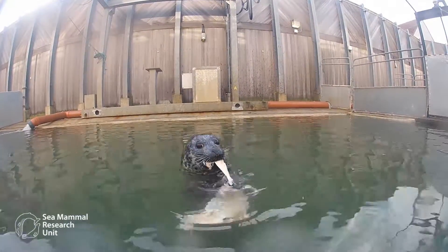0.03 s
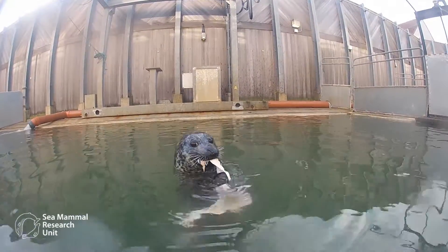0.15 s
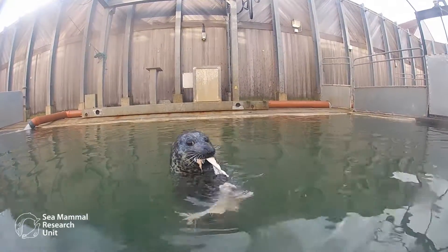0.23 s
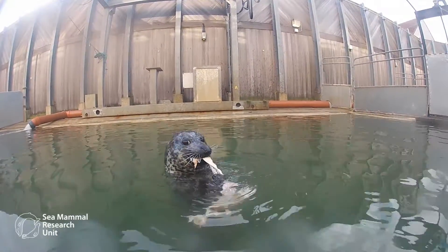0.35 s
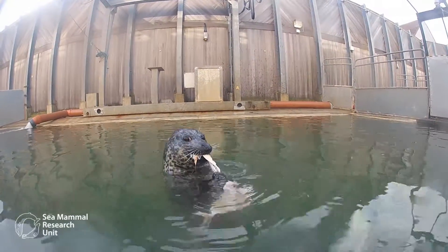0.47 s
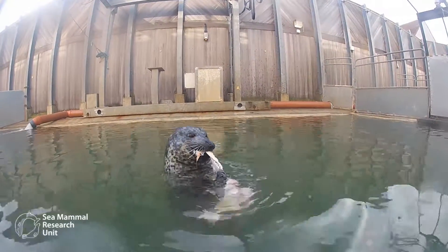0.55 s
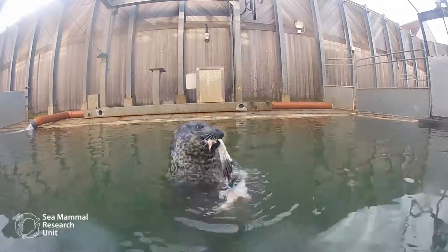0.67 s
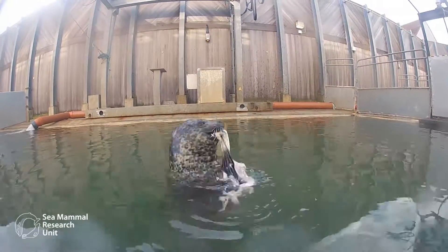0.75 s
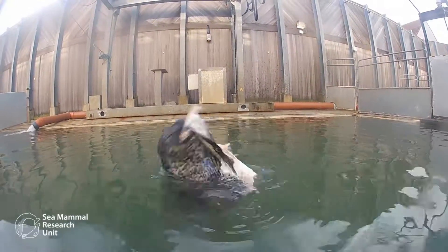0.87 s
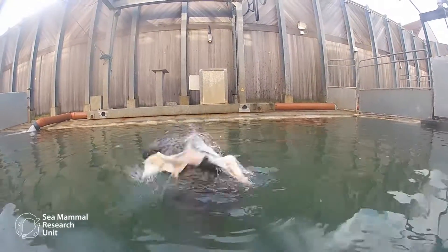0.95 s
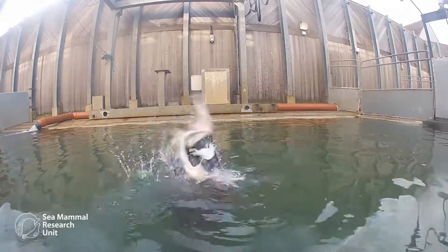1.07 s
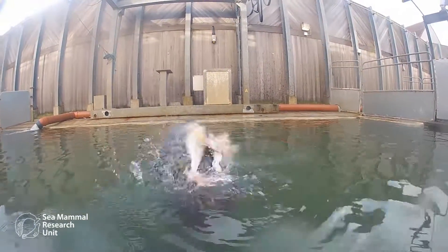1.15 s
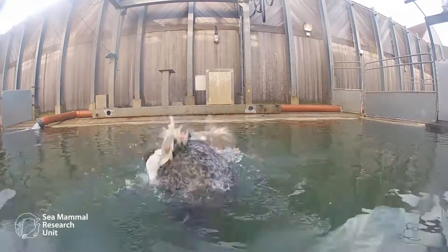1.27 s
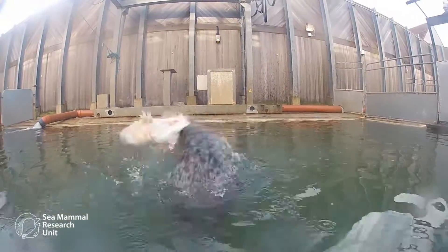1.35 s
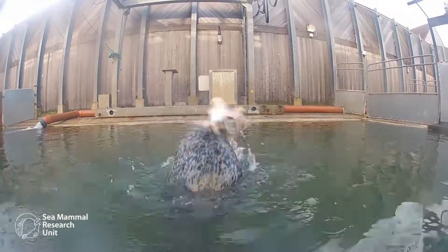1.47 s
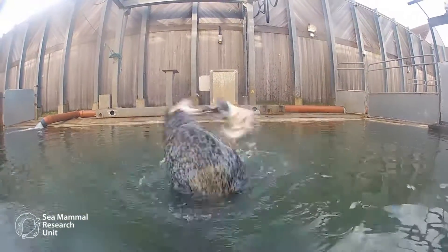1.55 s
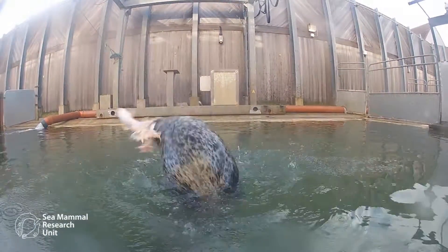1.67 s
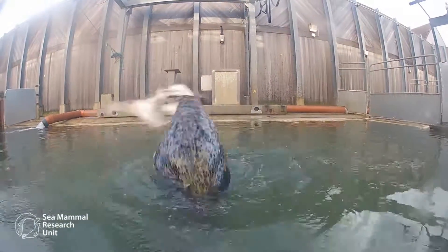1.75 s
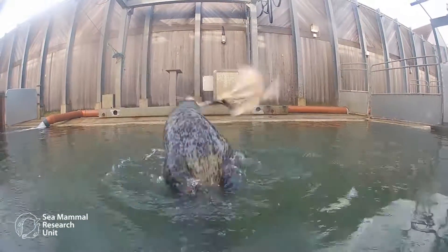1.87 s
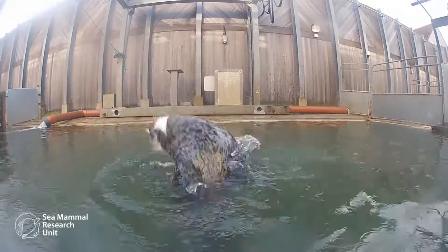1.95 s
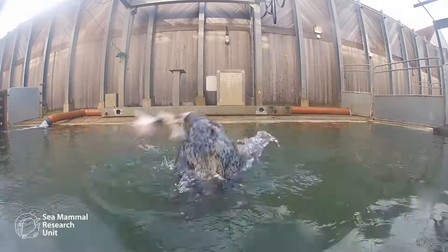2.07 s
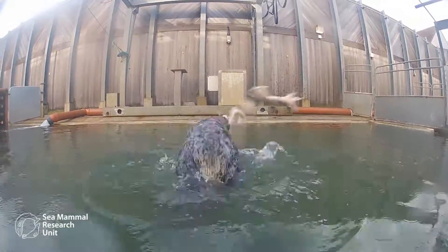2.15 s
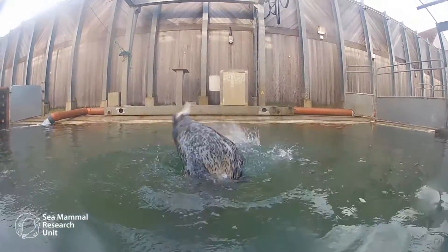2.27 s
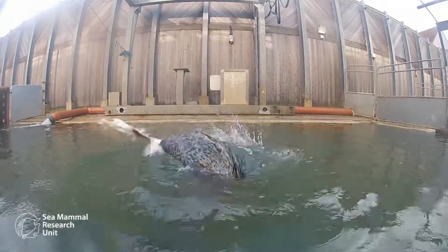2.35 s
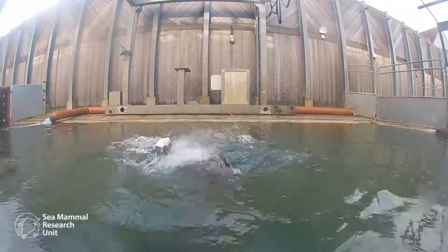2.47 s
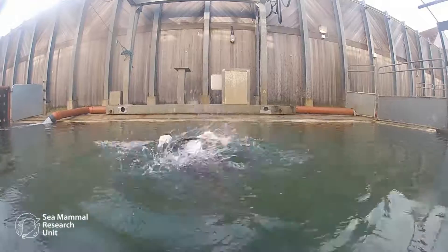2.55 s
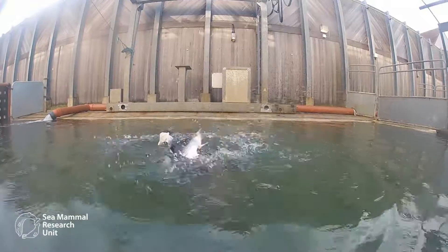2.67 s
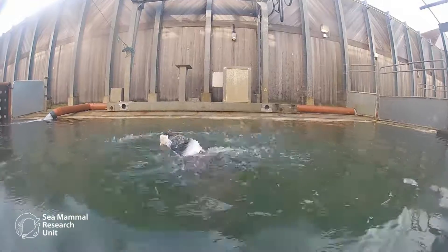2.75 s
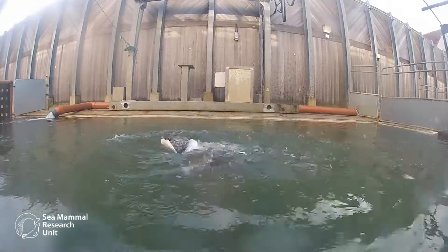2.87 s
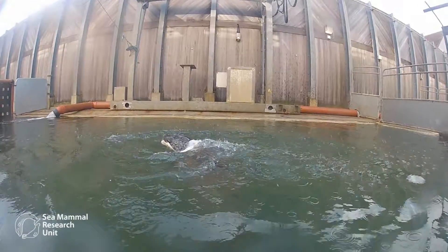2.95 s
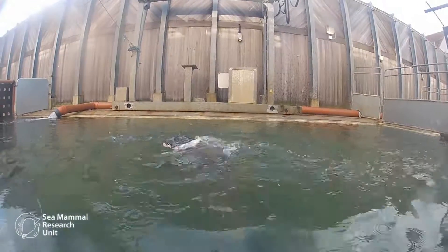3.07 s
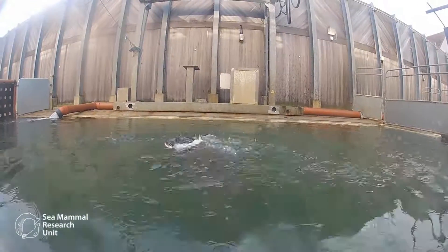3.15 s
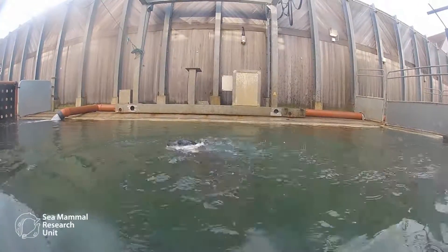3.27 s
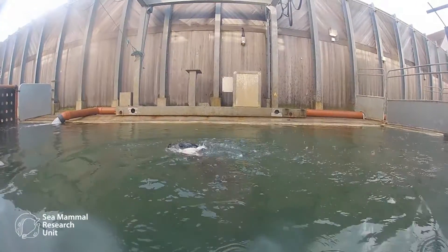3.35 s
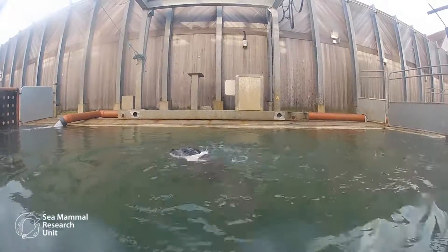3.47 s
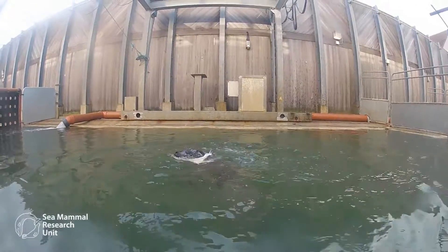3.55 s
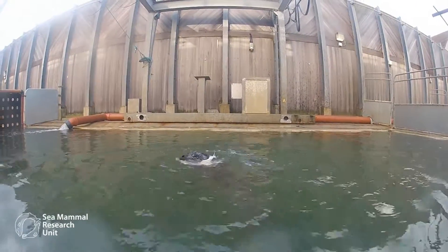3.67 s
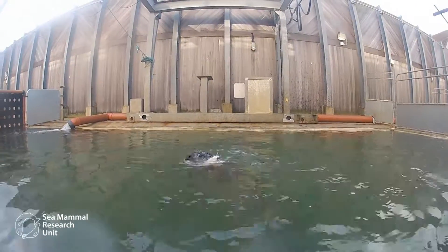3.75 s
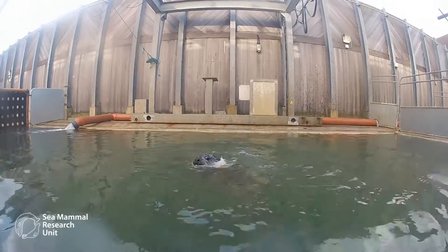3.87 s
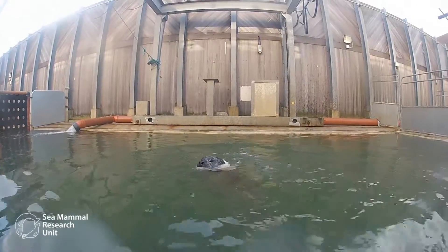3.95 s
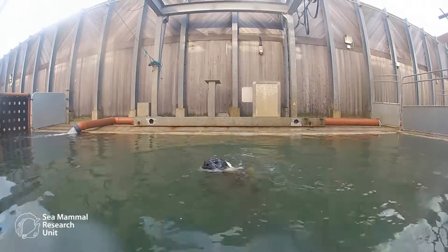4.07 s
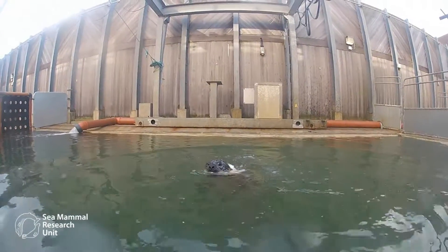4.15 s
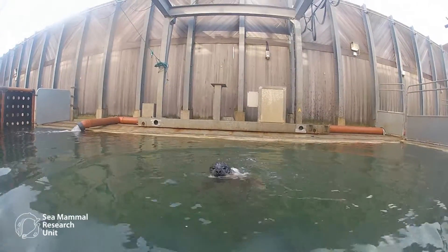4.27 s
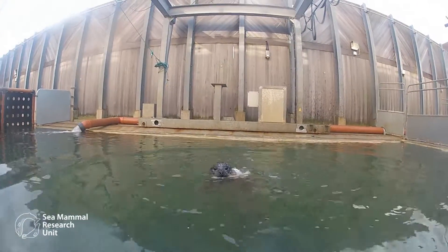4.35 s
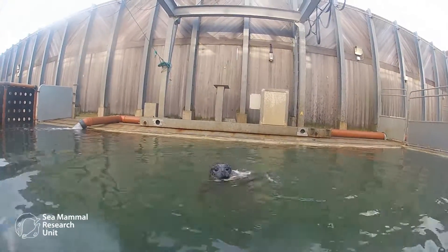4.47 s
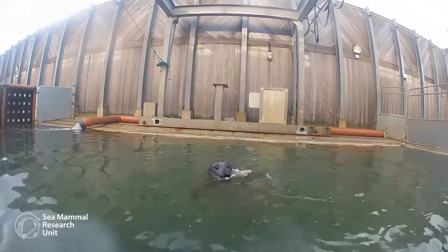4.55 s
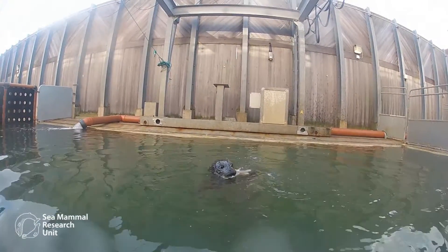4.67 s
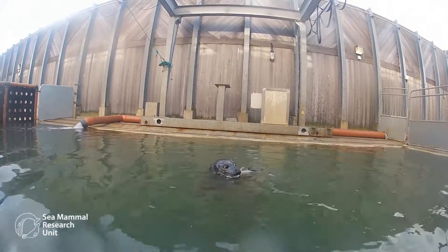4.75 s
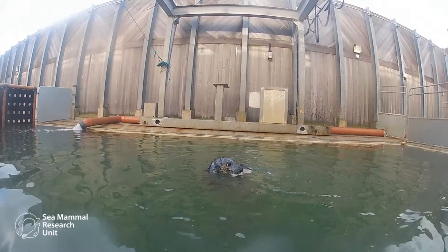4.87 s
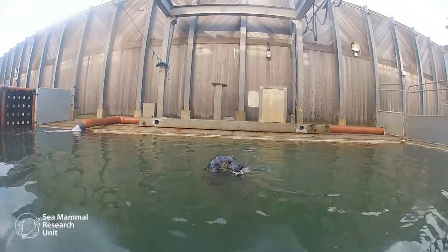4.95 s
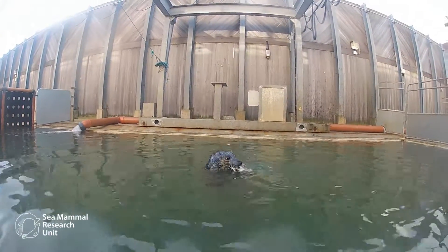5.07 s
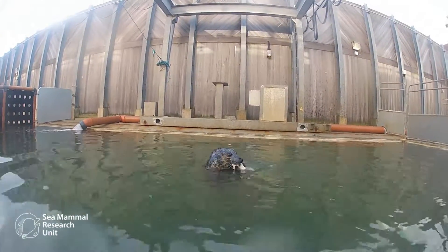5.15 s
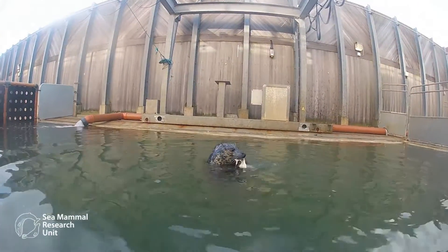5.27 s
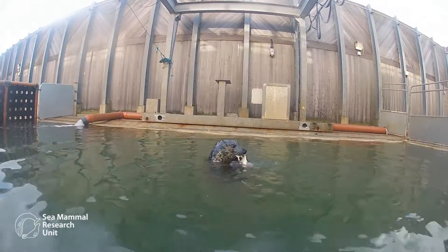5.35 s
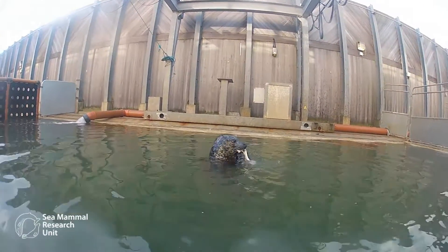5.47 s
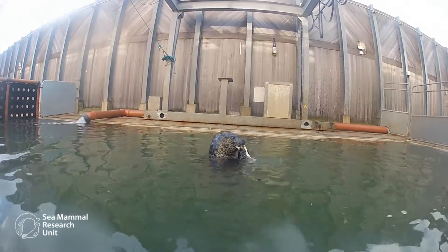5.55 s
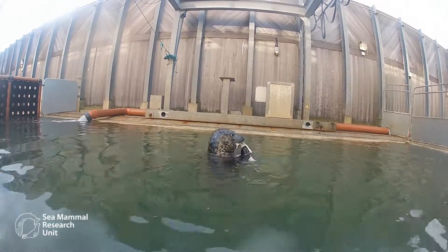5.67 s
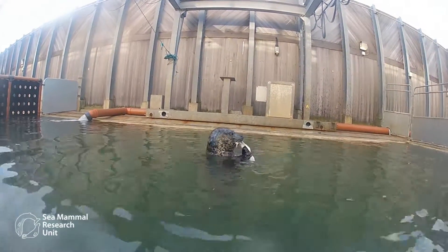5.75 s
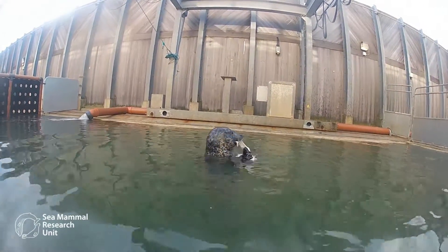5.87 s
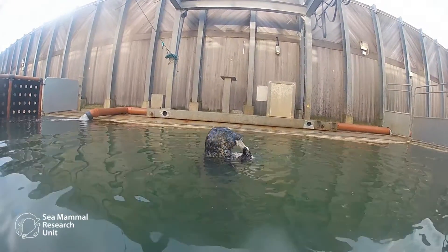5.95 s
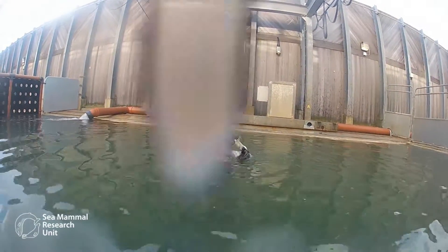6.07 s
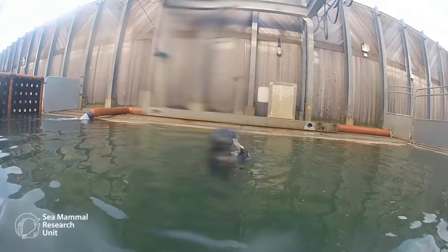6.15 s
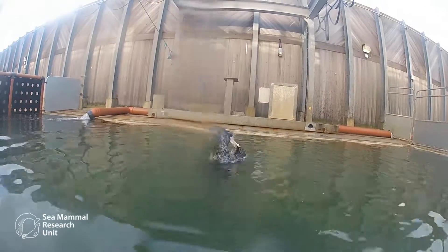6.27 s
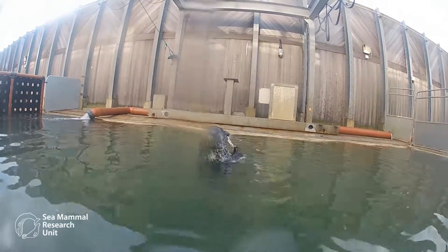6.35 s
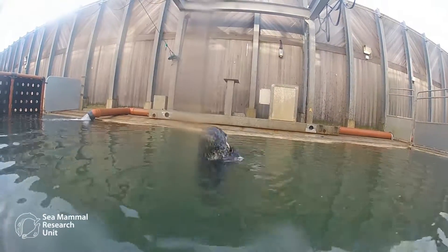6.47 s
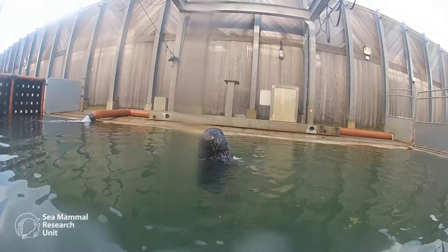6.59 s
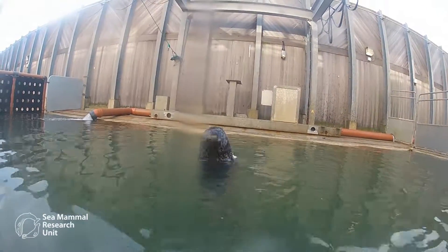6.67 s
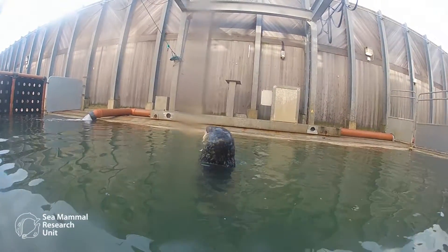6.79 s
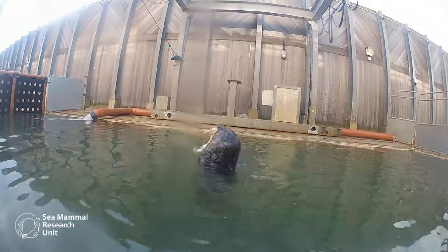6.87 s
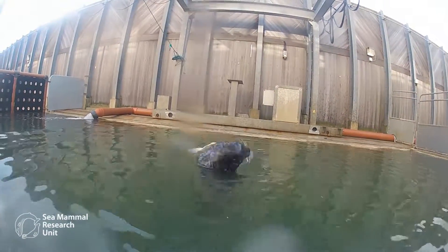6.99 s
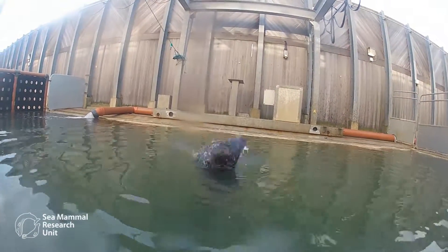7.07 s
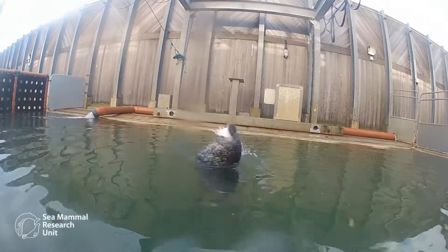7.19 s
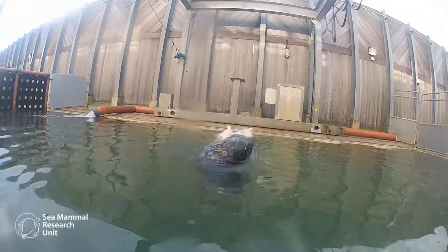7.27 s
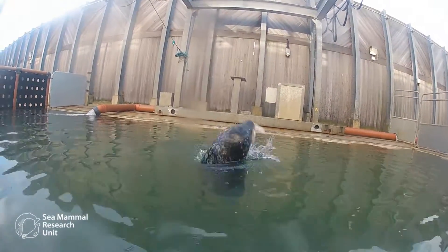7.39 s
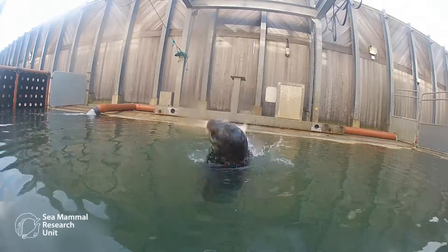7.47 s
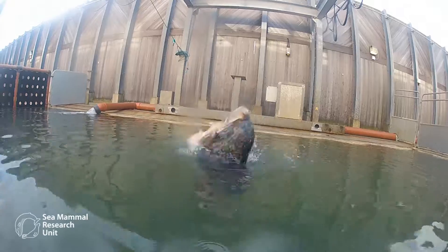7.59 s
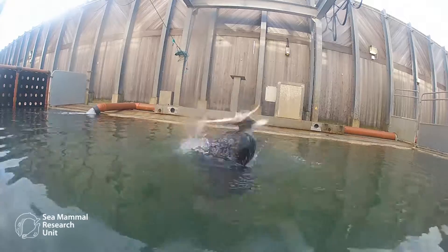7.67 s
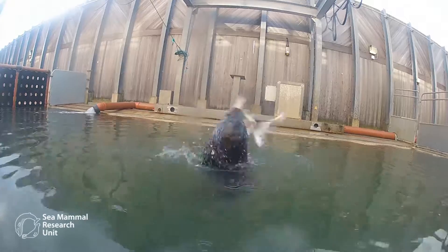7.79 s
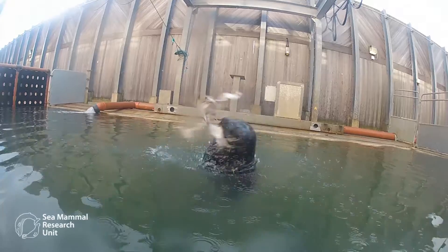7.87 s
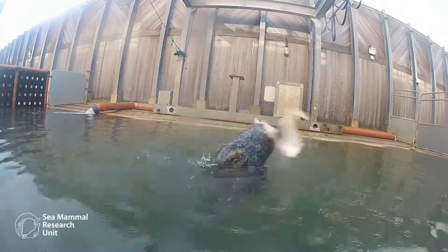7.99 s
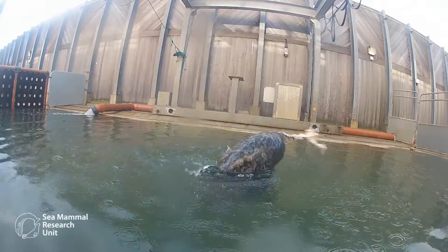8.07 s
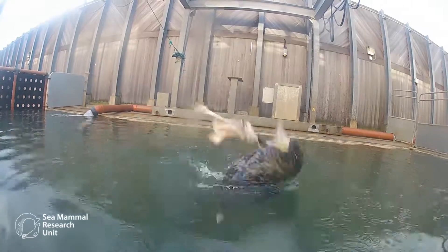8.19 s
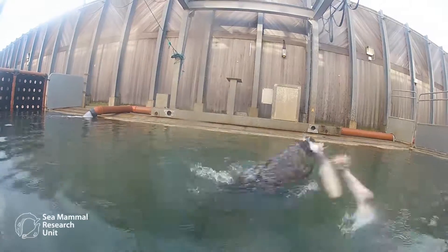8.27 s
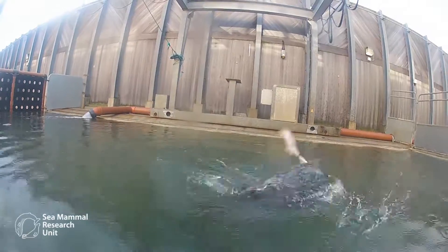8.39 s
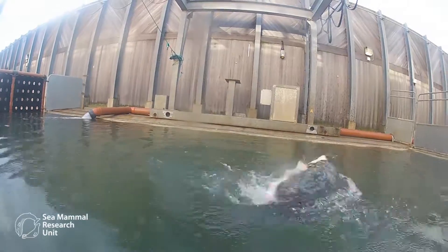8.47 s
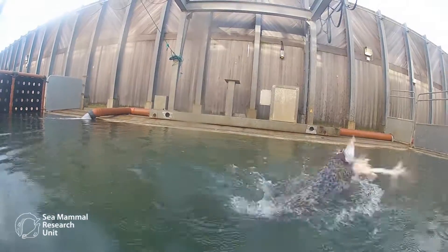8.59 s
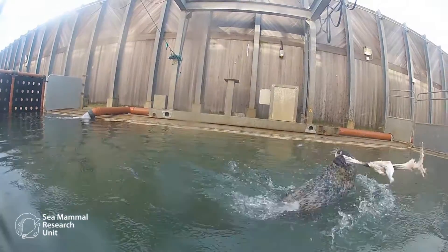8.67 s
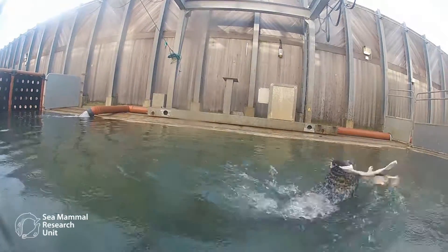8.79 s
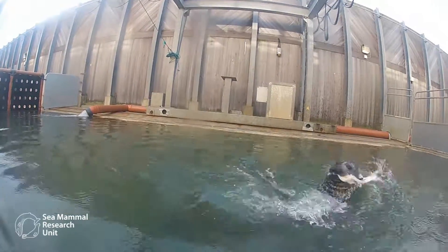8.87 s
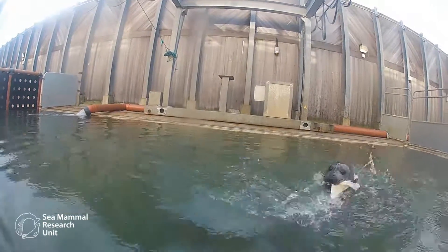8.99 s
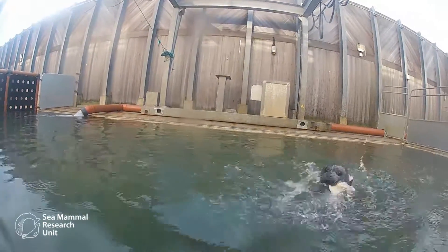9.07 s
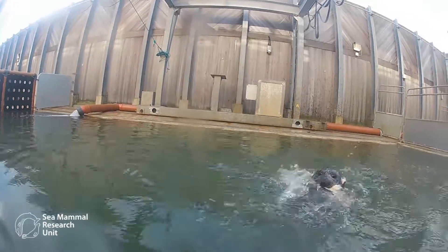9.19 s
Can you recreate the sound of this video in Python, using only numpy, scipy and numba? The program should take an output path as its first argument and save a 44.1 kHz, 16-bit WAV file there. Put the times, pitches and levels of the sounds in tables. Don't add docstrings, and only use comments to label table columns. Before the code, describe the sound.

A seal thrashes a fish in an outdoor pool, bright splashes, slaps and spray in two bouts, quiet lapping and faint gulls between.

```python
import sys
import numpy as np
from scipy import signal
from scipy.fft import rfft, irfft, next_fast_len
from scipy.io import wavfile
from scipy.ndimage import uniform_filter1d
from numba import njit

SR = 44100
rng = np.random.default_rng(int(sys.argv[2]) if len(sys.argv) > 2 else 0)


def ratio(d):
    e = np.asarray(d, float) / 20
    return 10 ** e


def materialize(psi):
    bounded = np.clip(np.atleast_2d(psi).T, -1, 1)
    quanta = np.round(bounded * 32767).astype(np.int16)
    wavfile.write(sys.argv[1], SR, quanta)


N = 407043


def level(x, db):
    return x * ratio(db) / np.sqrt(np.mean(x ** 2))


def curve(table):
    s, *columns = np.transpose(table)
    return [np.interp(np.arange(N) / SR, s, c) for c in columns]


def shaped(x, gain):
    size = next_fast_len(len(x))
    hz = np.arange(size // 2 + 1) * SR / size + 1e-3
    return irfft(rfft(x, size) * gain(hz), size)[:len(x)]


def colour(table):
    hz, db = np.transpose(table)
    noise = rng.standard_normal(N)
    return level(shaped(noise, lambda f: ratio(np.interp(np.log(f), np.log(hz), db))), 0)


def walk(rate_hz):
    k = int(SR / rate_hz)
    held = np.repeat(rng.standard_normal(N // k + 1), k)
    return 1.292 * uniform_filter1d(uniform_filter1d(held, k), k)[:N]


def swells(s, db, fall_s, rise):
    t = np.arange(0, N + 64, 64) / SR - s[:, None]
    away = np.where(t < 0, -t / rise, t) / np.maximum(fall_s, .01)[:, None]
    power = ratio(2 * db[:, None] - 20 * away).sum(axis=0)
    return np.interp(np.arange(N) / 64, np.arange(len(power)), power)


@njit
def ring(out, start, turn, fade, glide, size):
    for k in range(len(start)):
        a, phase, step, i = size[k], 0., turn[k], start[k]
        while a > size[k] / 200 and i < len(out) and step < 2.5:
            out[i] += a * np.sin(phase)
            phase, step, a, i = phase + step, step * glide[k], a * fade[k], i + 1
    return out


def bubbles(s, hz, t60_s, rise, size):
    start = (s * SR).astype(np.int64)
    fade = 1000. ** (-1 / (t60_s * SR))
    glide = (1 + rise) ** (1 / (t60_s * SR))
    return ring(np.zeros(N), start, 2 * np.pi * hz / SR, fade, glide, size)


def swarm(count, lo_hz, hi_hz, cycles, spread_db, rise):
    when, pitch, bulk = rng.random((count, 3)).T
    hz = lo_hz * (hi_hz / lo_hz) ** pitch
    size_db = spread_db * np.minimum(-np.log(bulk), 3)
    return level(bubbles(when * N / SR, hz, 2 * cycles / hz, rise + 0 * hz, ratio(size_db)), 0)


def bursts(table, shell, attack_s):
    out, t = np.zeros(N + 4096), np.arange(2048) / SR
    for s, db, hz, t60_s, width in table:
        attack = 1 - np.exp(-(t / attack_s) ** 2)
        blow = rng.standard_normal(len(t)) * attack * 1000. ** (-t / max(t60_s, .003))
        width = max(width, 1.05)
        band = signal.butter(2, [hz / width, min(hz * width, 9000)], "band", fs=SR, output="sos")
        blow = signal.fftconvolve(signal.sosfilt(band, blow), shell)
        start = int(s * SR)
        out[start:start + len(blow)] += ratio(db) * blow / np.abs(blow).max()
    return out[:N]


# (pitch [Hz], width [Hz], level [dB])
CASE_MODES = [(828, 104, -15), (1060, 240, -11), (1671, 287, -5.5), (2010, 257, -2.5), (2500, 403, -0.5),
              (3150, 1060, -3), (3705, 380, 2), (4300, 320, -14.5), (4870, 1260, -8.5)]
CASE_LEAK_DB = -20


def case():
    f = np.arange(2049) * SR / 4096
    power = ratio(2 * CASE_LEAK_DB)
    for hz, width_hz, db in CASE_MODES:
        power = power + ratio(2 * db) / (1 + (2 * (f - hz) / width_hz) ** 2) ** 2
    cepstrum = irfft(np.log(power) / 2)
    cepstrum[1:2048] *= 2
    cepstrum[2049:] = 0
    return irfft(np.exp(rfft(cepstrum)))[:1500]


POOL_T60_S, POOL_DB = 0.32, -7.5


def pool(x):
    t = np.arange(SR // 2) / SR
    tail = rng.standard_normal(len(t)) * 1000. ** (-t / POOL_T60_S) * (t > .012)
    return x + ratio(POOL_DB) * signal.fftconvolve(x, tail / np.sqrt(np.sum(tail ** 2)))[:N]


# (frequency [Hz], density [dB per Hz])
RUMBLE_SPECTRUM = [(12, -34), (20, -13.5), (43, -6), (81, -13), (97, -21.5), (119, -12), (461, -21.5),
                   (732, -34), (900, -45), (1170, -64), (1980, -120)]
RUMBLE_DB = -65
OUTDOOR_DB, OUTDOOR_TILT = -60.5, -0.69


def outdoors(shell):
    hiss = shaped(rng.standard_normal(N), lambda f: (f / 2000 + 0.014) ** OUTDOOR_TILT)
    gusty = hiss * ratio(1.34 * walk(8.2))
    hiss = level(signal.fftconvolve(gusty, shell)[:N], OUTDOOR_DB)
    return hiss + colour(RUMBLE_SPECTRUM) * ratio(RUMBLE_DB + 4 + 0.26 * walk(3.33))


def calls(table, waver, onset):
    out = np.zeros(N)
    for s0, s1, hz0, hz1, db, over_db in table:
        span = slice(int(s0 * SR), int(s1 * SR))
        u = np.linspace(0, 1, span.stop - span.start)
        hz = (hz0 + (hz1 - hz0) * u ** 1.37) * (1 + waver[span])
        phase = 2 * np.pi * np.cumsum(hz) / SR
        tone = np.sin(phase) + ratio(over_db) * (np.sin(2 * phase) + 0.41 * np.sin(3 * phase))
        flutter_db = 1.5 * np.roll(waver, SR)[span] / waver.std()
        out[span] += ratio(db + flutter_db) * np.sin(np.pi * u ** onset) ** 0.7 * tone
    return out


# (start [s], start pitch [Hz], level [dB])
GULL_YELPS = [
    (.57, 1205, -64),
    (3.58, 1150, -63),
    (6.058, 1143, -59.5),
    (6.175, 1155, -60),
    (6.29, 1130, -61),
    (6.405, 1140, -62),
    (6.516, 1103, -63),
    (6.62, 1140, -64),
]
YELP_S, YELP_SAG, YELP_OVERTONES_DB = 0.053, 0.041, -13
# (start [s], length [s], pitch [Hz], level [dB], overtones [dB])
GULL_CRIES = [
    (2.85, 0.08, 1153, -63, -15),
    (3.62, 0.072, 1330, -61.5, -5),
    (3.663, 0.09, 1342, -67, 15),
    (3.73, 0.093, 1328, -78, 16),
]
CRY_CLIMB = -0.0067
# (start [s], end [s], start pitch [Hz], end pitch [Hz], level [dB], overtones [dB])
HOARSE_CRY = [
    (6.28, 6.72, 1610, 1660, -66.5, -15),
    (6.38, 6.71, 1730, 1710, -66.5, -14.5),
]
# (start [s], length [s], pitch [Hz], level [dB])
CHIRPS = [(0.752, 0.13, 4880, -69), (3.43, .06, 4780, -67), (3.7, .08, 4650, -69),
          (4.885, 0.052, 4800, -69), (4.96, .08, 4730, -73), (5.11, .05, 4640, -73),
          (5.04, 0.07, 4700, -64), (6.165, 0.081, 4710, -63.5), (6.25, 0.083, 5020, -70),
          (6.326, 0.12, 4600, -67.5), (6.448, .05, 4570, -70)]
CHIRP_SAG = 0.0094


def birds():
    yelps = [(s, s + YELP_S, hz, hz * (1 - YELP_SAG), db, YELP_OVERTONES_DB) for s, hz, db in GULL_YELPS]
    cries = [(s, s + length_s, hz, hz * (1 + CRY_CLIMB), db, over_db)
             for s, length_s, hz, db, over_db in GULL_CRIES]
    chirps = [(s, s + length_s, hz, hz * (1 - CHIRP_SAG), db, -40) for s, length_s, hz, db in CHIRPS]
    waver = .005 * walk(40)
    gulls = calls(yelps, waver, 1.6) + calls(cries, waver, .8) + calls(HOARSE_CRY, .02 * walk(90), 1.3)
    return gulls + calls(chirps, .002 * walk(40), .5)


# (time [s], level [dB], length [s])
NUDGES = [(0.23, -50.5, 0.13), (0.91, -54, 0.091), (1.03, -56, 0.13), (1.63, -57, 0.33), (2.1, -53, 0.068),
          (2.32, -57, 0.12), (2.47, -54, 0.05), (2.58, -55, 0.09), (2.76, -65, 0.13), (3.02, -51.5, 0.24),
          (3.4, -53.5, 0.09), (3.77, -56.5, 0.57), (3.95, -47.5, 0.063), (4.1, -52, 0.061),
          (4.31, -55, 0.09), (4.71, -48.5, 0.16), (4.96, -44, 0.088), (5.11, -53, 0.074),
          (5.46, -51.5, 0.06), (5.82, -52, 0.15), (6.05, -56.5, 0.033), (6.57, -54.5, 0.07),
          (6.83, -50, 0.13), (7.02, -55, 0.27), (7.48, -55, 0.09), (8.08, -52.5, 0.12), (8.23, -55, 0.055),
          (8.42, -52, 0.086), (8.805, -46.5, 0.1), (9.06, -45.5, 0.16)]
# (time [s], level [dB], fall time [s])
WASH_WAVES = [
    (5.27, -53.5, 0.32),
    (5.7, -53, 0.16),
    (4.55, -56, 0.13),
    (1.4, -61, .2),
]
BOB_HZ, BOB_REST_DB = 80.9, -66
NUDGE_RISE, NUDGE_FALL = 0.75, 0.48


def bob():
    s, db, length_s = np.transpose(NUDGES)
    rest = ratio(2 * BOB_REST_DB) * ratio(4.2 * walk(10))
    nudges = swells(s, db, NUDGE_FALL * length_s, NUDGE_RISE)
    wash = swells(*np.transpose(WASH_WAVES), 0.93)
    size = np.sqrt(rest + nudges + wash)
    phase = 2 * np.pi * np.cumsum(BOB_HZ * (1 + 0.055 * walk(14))) / SR
    rough = shaped(rng.standard_normal(N), lambda f: 1 / (1 + ((f - BOB_HZ) / 18) ** 2))
    return size * ratio(0.95 * walk(30)) * (1.3 * np.sin(phase) + level(rough, -2.5))


# (time [s], peak [dB], centre [Hz], hollow ring [dB], bright crack [dB])
CASE_KNOCKS = [
    (8.3987, -16, 1920, -12, -7.5),
    (8.407, -21, 1870, -2.5, -1),
    (8.4255, -42, 1900, -15, -6),
    (8.4351, -36, 1670, 2, 5),
    (8.6945, -14, 2020, -4, -13),
    (8.7055, -17.5, 2370, -1, -7),
    (8.7160, -6.5, 1630, -19.5, -9),
]
KNOCK_T60_S, HOLLOW_HZ, PUSH_DB = 0.018, 935, -37


def knocks(shell):
    s, db, hz, hollow_db, crack_db = np.transpose(CASE_KNOCKS)
    one = np.ones(len(s))
    body = np.transpose([s, db - 8.5, hz, .7 * KNOCK_T60_S * one, 1.3 * one])
    crack = np.transpose([s, db + crack_db, 3150 * one, .45 * KNOCK_T60_S * one, 1.22 * one])
    note = bubbles(s + 0.00033, hz, 0.85 * KNOCK_T60_S * one, -.05 * one, ratio(db - 5.0))
    hollow = bubbles(s + 0.00096, HOLLOW_HZ * one, .78 * KNOCK_T60_S * one, 0.041 * one,
                     ratio(db + hollow_db - 4.0))
    push = bubbles(s, 260 * one, 0.012 * one, 0 * s, ratio(db + PUSH_DB - 21))
    return bursts(np.vstack([body, crack]), shell, attack_s=.0005) + note + hollow + push


# (time [s], peak [dB], pitch [Hz])
BODY_THUDS = [
    (8.013, -38.5, 195),
    (8.254, -44, 214),
    (8.314, -50, 258),
    (8.557, -40, 373),
]


def thuds():
    s, db, hz = np.transpose(BODY_THUDS)
    return bubbles(s, hz, 0.017 + 0 * s, 0 * s, ratio(db))


# (time [s], peak [dB], centre [Hz])
FLAT_SMACKS = [(1.4775, -48, 1200), (1.967, -46, 1000), (2.025, -45, 1100), (2.515, -44, 900),
               (1.709, -44, 5300), (2.0975, -45, 5500), (2.278, -45, 5000), (2.3605, -45, 5400),
               (2.4262, -46, 5600), (3.892, -45, 2300), (1.6447, -41, 1700), (1.8503, -40, 2000),
               (7.1315, -47, 2900), (8.0142, -42, 900), (8.0155, -38, 1900), (8.1965, -39, 900),
               (8.254, -40, 800), (8.314, -42, 1500), (8.4075, -31, 4850), (8.4345, -43, 5300),
               (8.7062, -29, 4600), (8.003, -42, 2700), (8.557, -39, 5400), (8.7163, -21, 4900),
               (8.7166, -27, 5700), (8.7072, -31, 5600), (8.4078, -32, 5700), (2.0895, -42, 4500),
               (2.5633, -39, 1700)]
SMACK_T60_S = 0.0055


def smacks():
    s, db, hz = np.transpose(FLAT_SMACKS)
    return bubbles(s, hz, SMACK_T60_S + 0 * s, 0 * s, ratio(db))


# (time [s], peak [dB], pitch [Hz])
AIR_POCKETS = [(.791, -54, 990), (.843, -51, 1080), (1.093, -45, 596), (1.175, -47, 1020),
               (1.206, -53, 910), (1.344, -50, 1060), (1.481, -44.5, 1043), (1.762, -47, 1140),
               (1.85, -52, 910), (1.899, -51.5, 1040), (1.995, -51.5, 1095), (2.248, -48, 850),
               (2.361, -47, 1160), (2.515, -46.5, 1060), (2.55, -47, 1044), (2.589, -49, 1050),
               (2.746, -49, 1090), (2.799, -52.5, 1060), (3.031, -56, 1220), (3.072, -52, 1040),
               (7.704, -44, 1010), (7.731, -40, 1060), (8.014, -48, 1280), (8.051, -46, 1120),
               (8.078, -47.5, 1120), (8.196, -49, 910), (8.253, -45, 1070), (8.313, -43, 1060),
               (8.553, -48, 860), (9.069, -43.5, 1010)]
GULP_T60_S, GULP_HZ = 0.044, 1050


def gulps():
    rows = [(s, db, hz, GULP_T60_S * hz / GULP_HZ, .15) for s, db, hz in AIR_POCKETS]
    rows += [(2.244, -49, 680, .12, 3.0)]
    s, db, hz, t60_s, rise = np.transpose(rows)
    return bubbles(s, hz, np.clip(t60_s, .01, .12), rise, ratio(db))


# (time [s], peak [dB], pitch [Hz])
LONE_DROPS = [(0.8053, -47, 3200), (1.0157, -52, 3620), (1.0396, -43, 3190), (1.0396, -51, 1980),
              (1.0586, -52, 3100), (1.0865, -47, 4480), (1.096, -48, 2070), (1.1185, -51, 2800),
              (1.1504, -47, 2020), (1.1655, -44.5, 3010), (1.1643, -49, 4480), (1.1918, -44, 2500),
              (1.203, -42, 2660), (1.3476, -42, 1980), (1.4317, -43, 3530), (1.466, -45, 2580),
              (1.59, -46, 1020), (1.6103, -43, 2120), (1.6234, -37, 2620), (1.762, -41, 1890),
              (1.772, -41, 1150), (1.772, -42, 2410), (1.777, -45, 3620), (1.8116, -45, 4480),
              (1.8129, -37.5, 2500), (1.8149, -50, 3550), (1.8488, -42, 3500), (1.967, -45.5, 1550),
              (1.9665, -43, 2500), (1.9665, -44, 4750), (2.0054, -51, 2500), (2.0623, -48, 3080),
              (2.08, -47, 1720), (2.0897, -38, 3250), (2.1192, -44, 3700), (2.272, -41.5, 980),
              (2.3, -48, 3790), (2.3127, -46, 1030), (2.341, -41, 3030), (2.3596, -42, 2330),
              (2.384, -49, 3010), (2.419, -49, 3620), (2.4207, -46, 2430), (2.433, -44, 2580),
              (2.562, -35, 2820), (2.5645, -47, 1030), (2.5881, -50, 2070), (2.642, -39.5, 2500),
              (2.651, -41, 3190), (2.7976, -37.5, 2670), (2.8303, -47, 2580), (2.8365, -50, 2070),
              (3.068, -45, 2580), (3.1049, -45, 3720), (3.1133, -49, 2580),
              (7.153, -45, 3720), (7.1637, -47, 3620), (7.4015, -45, 2460), (7.4221, -47, 3850),
                (7.485, -52, 2500), (7.734, -47, 2500), (7.741, -49.5, 1640), (7.7438, -41, 2560),
                (7.8132, -46, 3700), (7.8412, -44, 1920), (7.8422, -48.5, 885), (7.8656, -41, 3750),
                (7.8741, -36.5, 3790), (7.8925, -38, 3030), (7.901, -39, 2470), (7.908, -42.5, 1740),
                (8.0018, -43.5, 4480), (8.0248, -39, 2900), (8.039, -40, 3010), (8.093, -47, 780),
                (8.1036, -46, 600), (8.221, -43, 3660), (8.2353, -47, 3160), (8.2572, -43, 3560),
                (8.2762, -45, 1720), (8.2815, -43, 3170), (8.3123, -44, 3700), (8.3144, -45, 2760),
                (8.5575, -27.5, 3650), (8.5545, -35, 3600), (8.5715, -39, 3750), (8.5687, -39, 2400),
                (8.8253, -48, 1710), (8.8808, -44, 4820), (8.8998, -50, 1720), (8.9197, -44, 3920),
                (8.9536, -43, 2410), (8.9656, -54, 1890), (8.9693, -48, 2400), (8.972, -47, 1110),
                (8.995, -51, 1030), (9.015, -45, 1660), (9.0285, -46, 3720), (9.041, -45, 2320),
                (9.0437, -43, 1720), (9.065, -45, 3680), (9.0887, -46, 1690), (9.0903, -46, 2410),
                (9.0923, -46, 860), (9.1178, -43, 1040), (9.1233, -43, 1640), (9.1332, -41, 3720),
                (9.149, -46, 3700), (9.1542, -40, 1630), (9.158, -46, 2700), (9.1632, -49, 2650),
                (9.1642, -45, 1050), (9.1642, -54, 2150),
              (3.257, -47.5, 3620), (3.41, -52, 3780), (3.524, -53, 3760), (3.6597, -48, 3620),
               (1.898, -45, 3000), (1.9302, -44, 3650), (1.9547, -42, 3770), (2.096, -44, 2000),
               (2.246, -45, 3630), (3.8918, -39.5, 1800), (4.4988, -55, 3700), (4.5058, -51, 3790),
               (4.5477, -51, 2500), (6.0492, -52.5, 2400), (6.0802, -48, 3030), (7.133, -50, 1980),
               (7.144, -48, 1950), (8.024, -35, 3730), (8.3993, -29, 3760), (8.429, -33, 1850),
               (8.695, -32, 3445)]
DROP_T60_S, DROP_CLIMB = .018, .06
DROP_ONSET, DROP_LEAD_S = .3, .0004


def drops():
    s, db, hz = np.transpose(LONE_DROPS)

    def decay(share):
        climb = (1 + DROP_CLIMB) ** share - 1
        return bubbles(s - DROP_LEAD_S, hz, share * DROP_T60_S + 0 * s, climb + 0 * s, ratio(db + 4.0))

    return decay(1) - decay(DROP_ONSET)


# (time [s], peak [dB], width [ratio])
SPRAY_TICKS = [(0.2606, -38.5, 1.12), (0.8274, -43.5, 1.14), (1.094, -38.5, 1.1), (1.131, -34.5, 1.17),
               (1.1578, -40.5, 0.84), (1.1995, -40, 1), (1.271, -42.5, 1.1), (1.294, -46, 1.5),
               (1.372, -35, 1.25), (1.607, -41, 1.06), (1.644, -32.5, 1.16), (1.6974, -28.5, 1.4),
               (1.9657, -32.5, 1.1), (2.0241, -30.5, 1.5), (2.2758, -29.5, 1.13), (2.495, -48, 1.1),
               (2.5141, -27.5, 1.37), (2.5385, -28, 1.12), (2.5461, -32, 1.2), (2.713, -40, 1.16),
               (2.7556, -41.5, 1.07), (2.8577, -37.5, 1.08)]
# (time [s], peak [dB], width [ratio])
LATE_TICKS = [(7.132, -40.5, 1.2), (7.2967, -45, 1.2), (7.7445, -39, 1.1), (7.812, -44.5, 1.9),
              (7.8665, -40, 1.2), (7.9458, -33.5, 2.6), (8.0139, -27, 1.46), (8.039, -46, 1.8),
              (8.3368, -38.5, 1.14), (8.5505, -32, 1.15), (8.5568, -28, 1.28), (8.5919, -38, 1.5),
              (8.851, -41, 0.97), (8.8823, -55, 1.2), (8.911, -39.5, 1.17), (8.994, -56, 1.3),
              (9.042, -50, 1.5), (9.11, -42, 1.04), (9.155, -48, 1.2), (9.185, -44.5, 1)]
TICK_HZ, LATE_TICK_HZ = 3630, 3820
# (time [s], peak [dB], centre [Hz])
FISH_SLAPS = [(.8036, -49, 1970), (1.039, -40, 3250), (1.0799, -53, 2680), (1.3387, -37, 3480),
              (1.4678, -39, 2580), (1.4765, -42, 1920), (1.5812, -35.5, 2900), (1.6444, -40, 1900),
              (1.761, -34.5, 2500), (7.839, -38, 2500), (1.799, -42, 2580), (1.8128, -40.5, 2480),
              (1.8493, -39, 1980), (2.0955, -42, 2760), (2.27, -33, 1900), (2.3104, -38, 3110),
              (2.3569, -33.5, 2350), (2.562, -34, 2760), (2.64, -35.5, 3150), (2.6614, -38, 2480),
              (2.7975, -41, 2480), (3.891, -46, 1690), (7.7007, -34, 2500), (8.0034, -35, 2750),
              (8.1966, -42.5, 2010), (8.2207, -45, 1870), (8.254, -40, 1540), (8.557, -31.5, 1680),
              (8.4874, -39, 1680), (8.756, -39, 2010)]
SLAP_T60_S = .012
SLAP_WIDTH, LOW_SLAP_WIDTH, MIDDLE_HZ = 1.35, 1.143, 2100
# (time [s], peak [dB])
SPRAY_SNAPS = [(1.0873, -46), (1.2955, -38), (1.477, -36), (1.583, -44), (1.8027, -38), (1.8133, -37.5),
               (2.0896, -39), (2.426, -47), (2.4329, -41), (2.496, -42), (2.536, -38), (2.543, -33),
               (2.555, -37), (7.6984, -35.5), (7.948, -45), (8.3727, -35), (8.8804, -43)]
SNAP_HZ, SNAP_WIDTH = 4700, 1.27


def splashes(shell):
    rows = [(s, db, TICK_HZ, SLAP_T60_S, width) for s, db, width in SPRAY_TICKS]
    rows += [(s, db, LATE_TICK_HZ, SLAP_T60_S, width) for s, db, width in LATE_TICKS]
    for s, db, hz in FISH_SLAPS:
        rows.append((s, db, hz, SLAP_T60_S, SLAP_WIDTH if hz > MIDDLE_HZ else LOW_SLAP_WIDTH))
    rows += [(s, db, SNAP_HZ, SLAP_T60_S, SNAP_WIDTH) for s, db in SPRAY_SNAPS]
    return bursts(rows, shell, attack_s=0.0013)


# (time [s], spray [dB], bubbling against spray [dB])
SEAL_EFFORT = [(0, -65, -17), (.35, -72, -7), (.95, -67, -9), (1.08, -51, -9), (1.6, -51.5, -32),
               (1.75, -55.5, -13), (2.0, -53, -18), (2.2, -55, -10), (2.45, -51.5, -11),
               (2.65, -53.5, -10.5), (3.6, -64.5, -8), (4.4, -66, -5), (5.4, -73, -4), (6.75, -70, -4),
               (7.4, -57, -13), (8.3, -52.5, -6), (9.15, -53, -5.5), (9.23, -67, -4)]
# (time [s], spray [dB], ten-dB fall time [s], coarse drops against spray [dB])
SWING_SURGES = [(.8, -60.5, 0.3, -1.5), (1.189, -43, -0.07, -15), (1.36, -44, 0.05, -23),
                (1.648, -44, 0.02, -10), (1.698, -38.5, 0, -15), (1.87, -56, -0.7, -11),
                (1.97, -59, -0.02, -2), (2.09, -56, -0.27, -15), (2.275, -48, 0, -2),
                (2.37, -48.5, 0.06, -4), (2.5, -57, -0.6, -17), (2.55, -42, 0.03, -3), (2.88, -64, 0.8, 1),
                (3.55, -71, -1.5, -7), (4.345, -64, 0.02, 7), (4.54, -56, 0.12, -4), (6.3, -63, 0.2, -6),
                (6.95, -62, 0.23, 1), (7.14, -53, 0.06, -9), (7.705, -46, -0.3, -14), (7.88, -45, 0, -4),
                (8.021, -45, 0.03, 5), (8.226, -49, -0.15, -6), (8.428, -45, -0.03, 9.5),
                (8.562, -41.5, 0.03, -4), (8.75, -47.5, -0.52, -10), (8.99, -52, -0.07, 0),
                (9.11, -47.5, -0.15, -2), (9.16, -57.5, 0.5, 1), (8.09, -52, -0.5, 5)]
SURGE_RISE, COARSE_DROPS_DB = 0.73, -7
MIST_DB, MIST_HZ = -17.5, 5300
MIST_KNEE_DB = -50


def churn(shell):
    spray_db, low_db = curve(SEAL_EFFORT)
    s, db, fall_s, coarse_db = np.transpose(SWING_SURGES)
    spray = np.sqrt(ratio(2 * spray_db) + swells(s, db, fall_s, SURGE_RISE))
    coarse_size = np.sqrt(ratio(2 * (spray_db + COARSE_DROPS_DB)) + swells(s, db + coarse_db, fall_s, SURGE_RISE))
    fine = swarm(count=8000, lo_hz=2270, hi_hz=5300, cycles=8.7, spread_db=-1.0, rise=0.64)
    crackle = ratio(-8.0) * swarm(count=1500, lo_hz=3330, hi_hz=6200, cycles=5.4, spread_db=0.0, rise=0.)
    coarse = swarm(count=4000, lo_hz=1432, hi_hz=2330, cycles=7.0, spread_db=2.5, rise=0.78)
    slosh = swarm(count=2000, lo_hz=524, hi_hz=1350, cycles=9.3, spread_db=0.0, rise=0.27)
    hiss = ratio(-4) * rng.standard_normal(N)
    mist = shaped(crackle + hiss, lambda f: 1 / (1 + (MIST_HZ / f) ** 12) * (f < HOLD_HZ / 2))
    mist = level(mist, MIST_DB) * (spray / ratio(MIST_KNEE_DB)) ** .25
    layers = (fine + crackle + hiss, coarse, slosh)
    fine, coarse, slosh = (level(signal.fftconvolve(x, shell)[:N], 0) for x in layers)
    return ratio(-3.0) * (spray * (fine + mist + ratio(low_db) * slosh) + coarse_size * coarse)


GULP_WET = 0.51


def scene():
    shell = case()
    pockets = gulps() + birds()
    echoed = pool(splashes(shell) + drops() + GULP_WET * pockets)
    water = (1 - GULP_WET) * pockets + churn(shell) + smacks() + thuds()
    mono = echoed + water + knocks(shell) + bob() + outdoors(shell)
    return np.array([mono, mono])


HOLD_HZ, STORE_HZ = 12000, 48000
ALIAS_HZ, TOP_HZ, SKIRT_DB = 5700, 15330, -33


def hold(x):
    slow = shaped(x, lambda f: 1 / np.sqrt(1 + (f / ALIAS_HZ) ** 24) * (f < HOLD_HZ / 2))
    imaged = slow * (1 + 2 * np.cos(2 * np.pi * HOLD_HZ * np.arange(N) / SR))
    return shaped(imaged, lambda f: np.sinc(f / HOLD_HZ) / np.sinc(f / STORE_HZ) * ratio(SKIRT_DB * (f > TOP_HZ)))


# (frequency [Hz], density [dB per Hz])
GRIT_SPECTRUM = [(15, -36), (25, -0.5), (266, -4), (1440, -16.5), (2450, -16.5), (4940, -16.5), (5990, -27),
                 (6920, -20.5), (8000, -20), (10400, -61), (17600, -120)]
SIDE_DB = -79


def grit():
    return colour(GRIT_SPECTRUM) * ratio(SIDE_DB)


def band_limit(x):
    return signal.sosfilt(signal.butter(12, 16460, fs=SR, output="sos"), x)


def record(dry):
    held, side = hold(dry[0]), grit()
    return band_limit(np.array([held + side, held - side]))


dry = scene()
out = record(dry)
materialize(out)
```